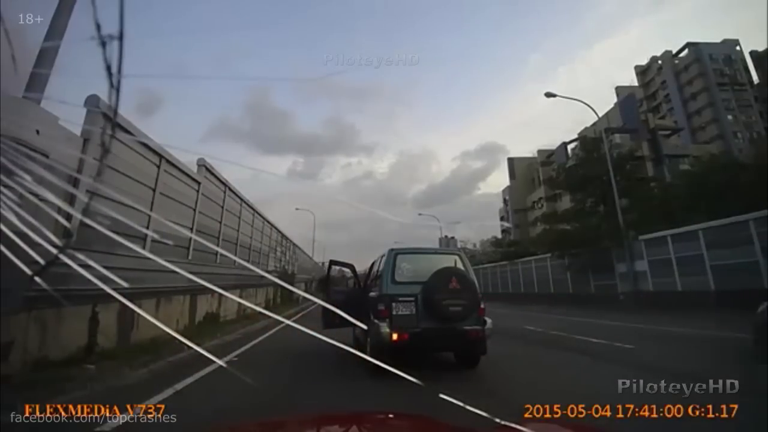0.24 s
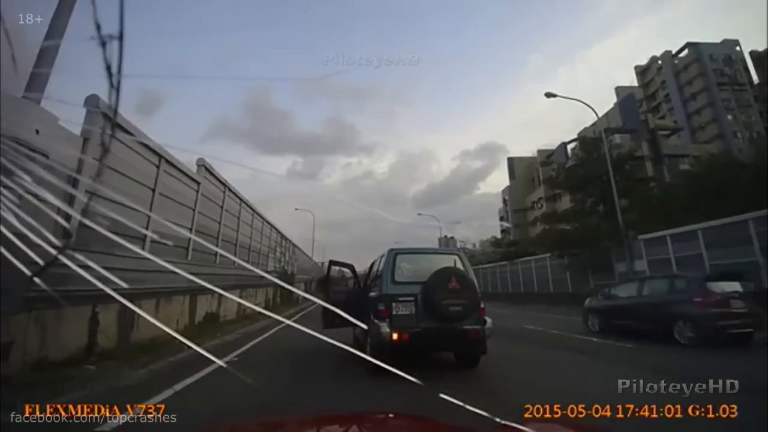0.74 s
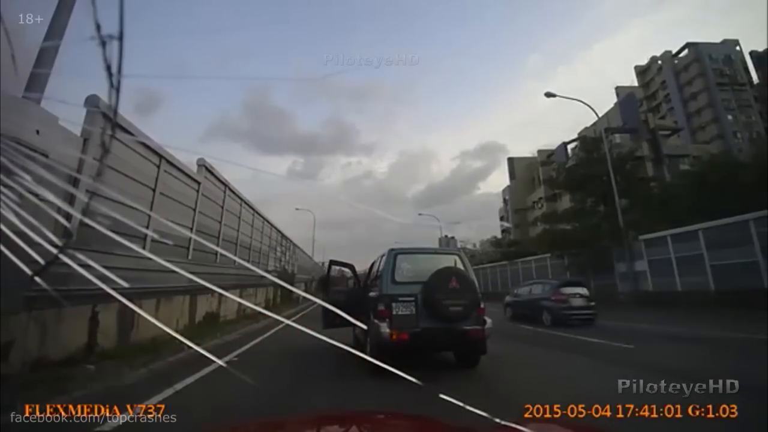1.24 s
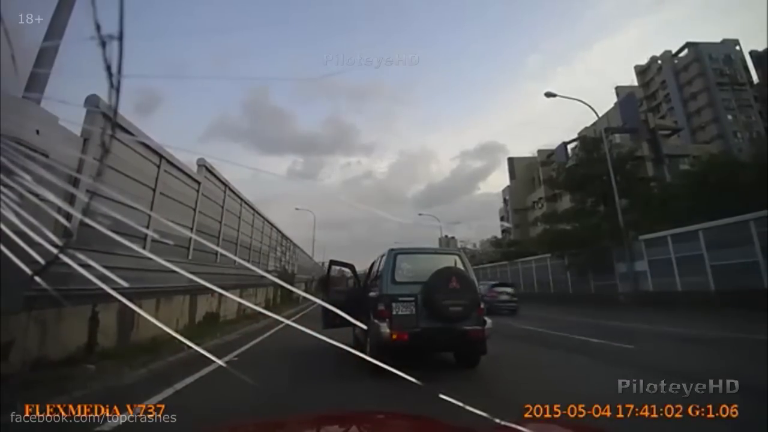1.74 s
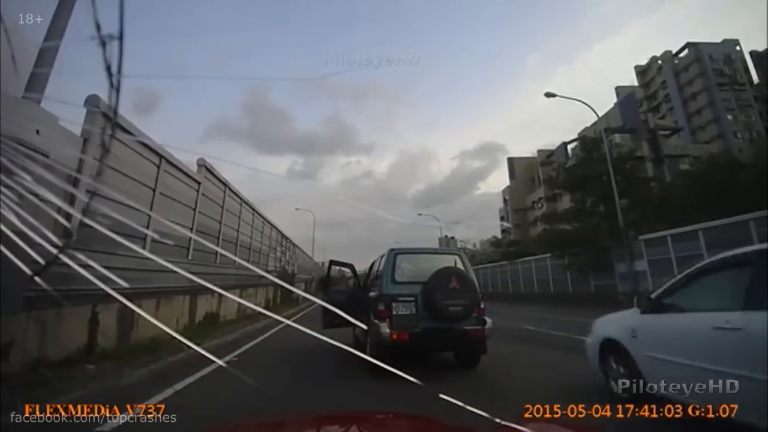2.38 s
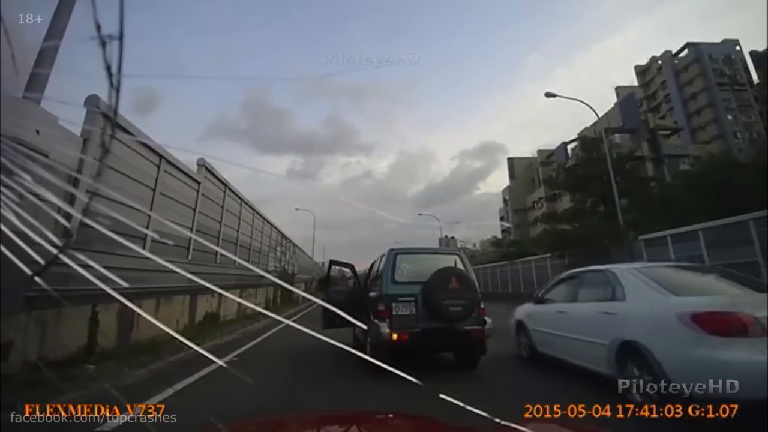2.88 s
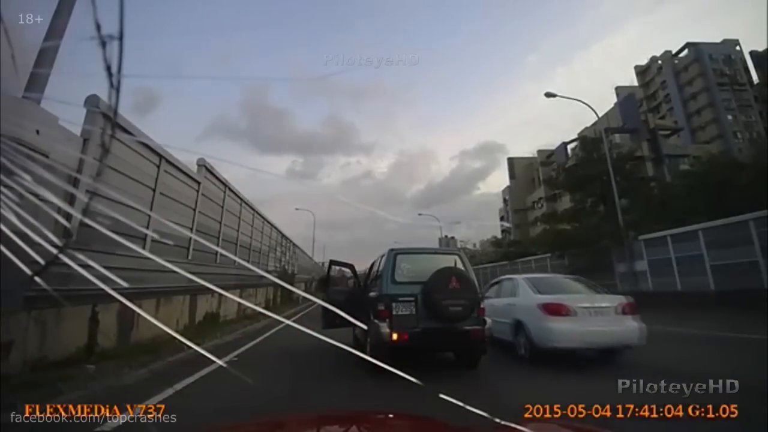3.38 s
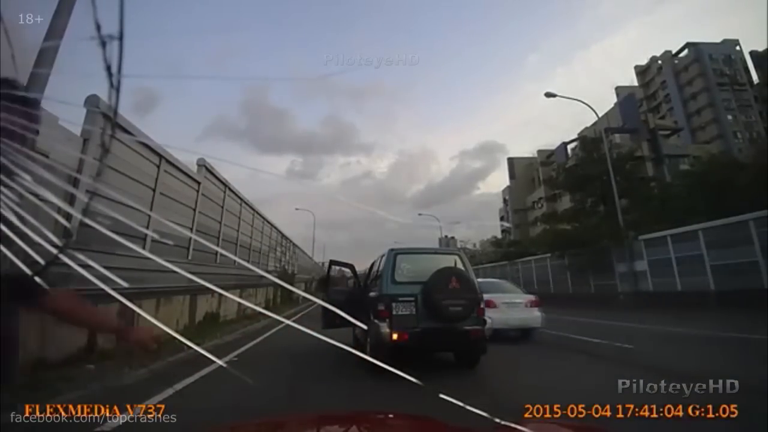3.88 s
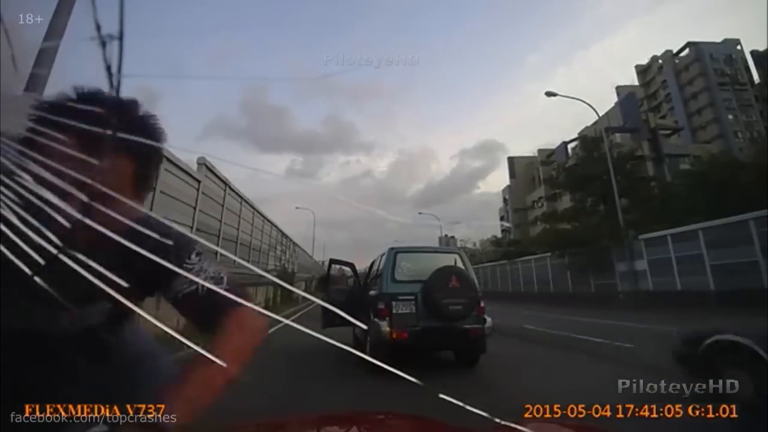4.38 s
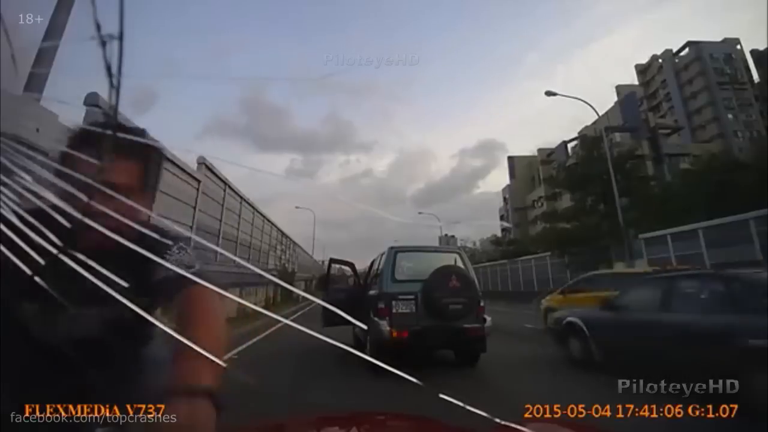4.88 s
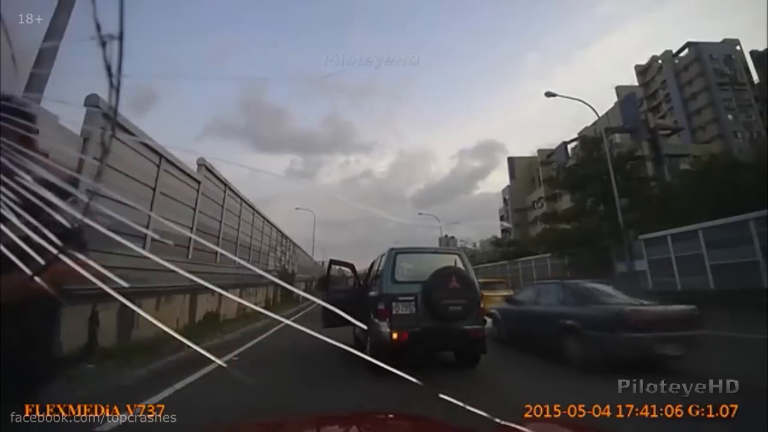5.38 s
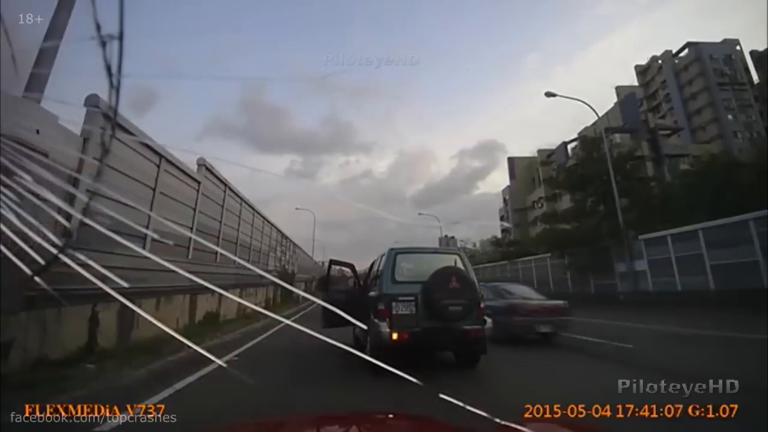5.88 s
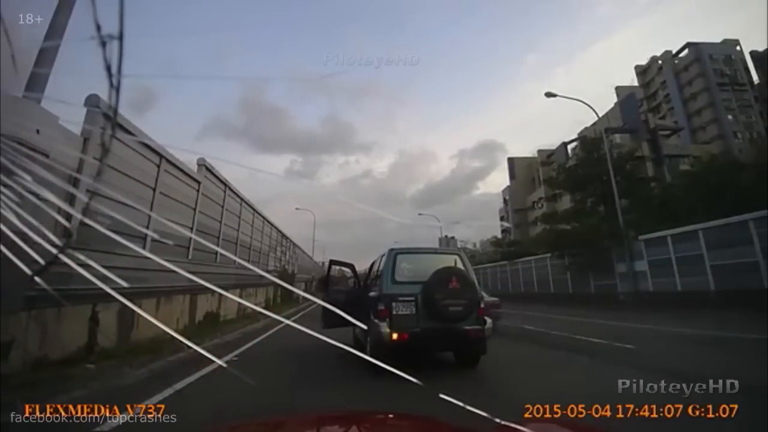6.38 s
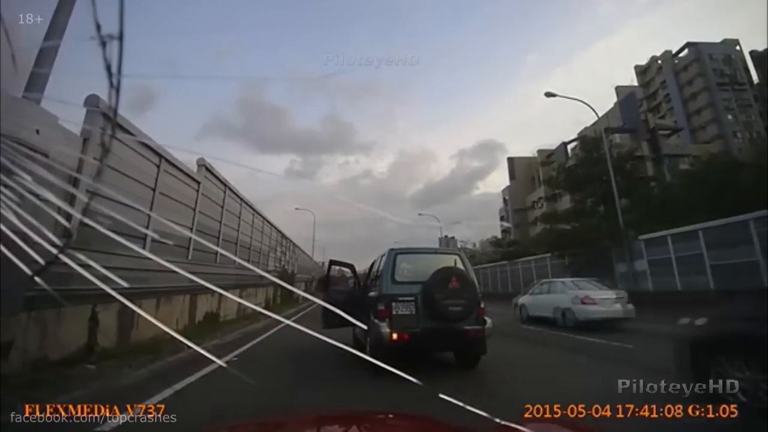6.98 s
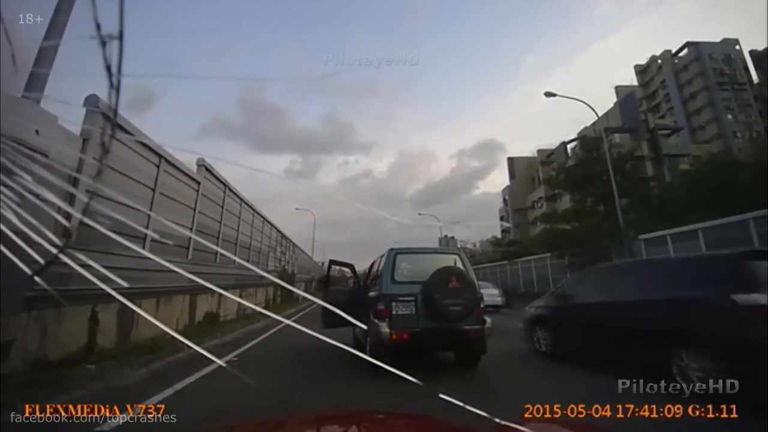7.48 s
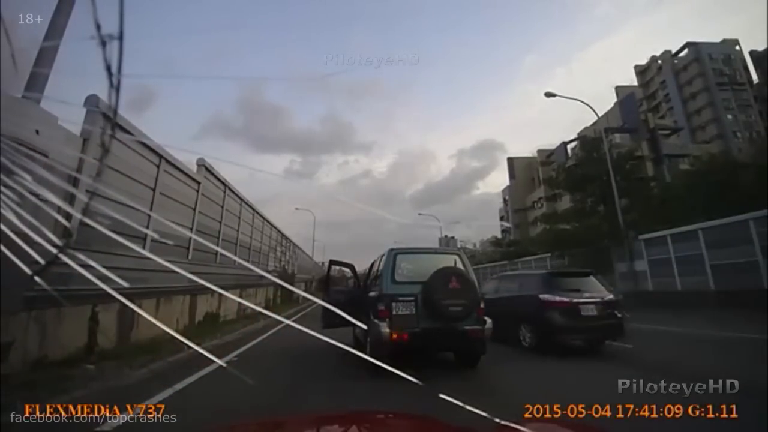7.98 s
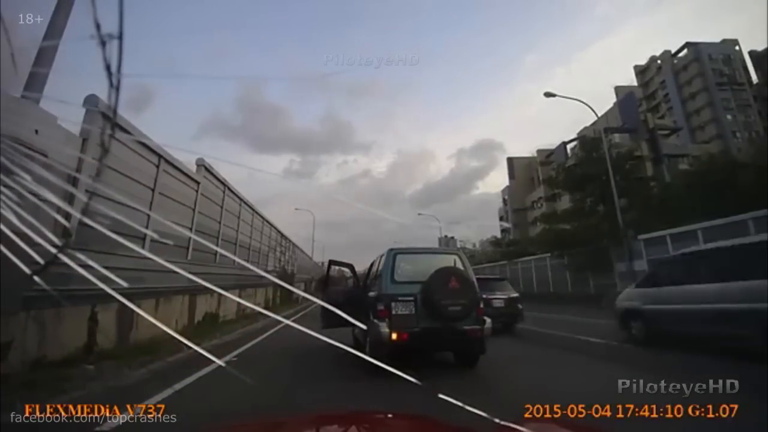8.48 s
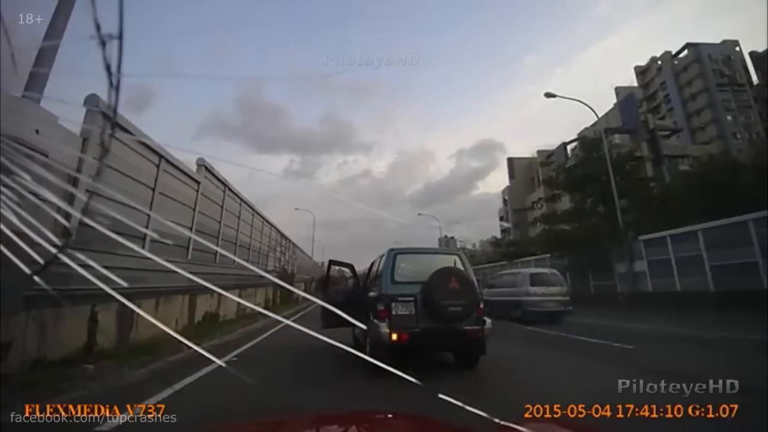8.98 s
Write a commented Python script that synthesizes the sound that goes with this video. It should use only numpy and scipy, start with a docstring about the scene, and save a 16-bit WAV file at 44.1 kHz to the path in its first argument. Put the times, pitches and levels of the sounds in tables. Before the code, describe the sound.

Irregular heavy bangs strike a car body and windscreen, heard from the hushed cabin, with small trim knocks, rubbing and thin plastic ticks between.

```python
"""Muffled road noise, circuit hiss and a faint whine lie low inside a stopped car, heard at its windscreen.
Knocks, rubbing and thin ticks run through the trim, and hard blows crash on the body and glass.
Steady layers are shaped noise and sines. Blows are noisy contact forces: they excite damped modes of body,
panels and trim, with filtered noise for the glass; ticks ring a plastic bracket. The cabin adds a decaying tail."""
import sys
import numpy as np
from scipy import signal
from scipy.fft import rfft, irfft, next_fast_len
from scipy.io import wavfile
from scipy.ndimage import uniform_filter1d

SR = 44100
rng = np.random.default_rng(int(sys.argv[2]) if len(sys.argv) > 2 else 0)


def log_audio(samples):
    """Write samples as a 16-bit WAV file to the path given in sys.argv[1]."""
    # one column per channel
    frames = np.atleast_2d(samples).T
    # limit to full scale, then quantise
    limited = np.clip(frames, -1, 1)
    pcm = np.round(limited * 32767).astype(np.int16)
    wavfile.write(sys.argv[1], SR, pcm)


N = 407484   # samples

# How far from its centre a knock or scuff still stirs the modes.
# Each entry: part, spread in octaves.
KNOCK_SPREAD_OCT = {"body": 0.2, "panel": 0.55, "trim": 1}


def amp(db):
    """Logarithmic level: 20 dB is a tenfold amplitude."""
    return 10 ** (np.asarray(db) / 20)


def rms_one(x):
    """Normalisation of mean power: the result has rms 1."""
    return x / np.sqrt(np.mean(x ** 2) + 1e-20)


def coloured_noise(spectrum):
    """Spectral shaping: white noise weighted in the frequency domain, at rms 1."""
    hz, db = np.transpose(spectrum)
    size = next_fast_len(N)
    log_hz = np.log(np.fft.rfftfreq(size, 1 / SR) + 1)
    gain = amp(np.interp(log_hz, np.log(hz), db, left=-80, right=-80))
    white = rng.standard_normal(size)
    return rms_one(irfft(rfft(white) * gain, size)[:N])


def road():
    """Transmission loss: passing traffic through the glass is noise with its treble removed."""
    # Level of the traffic. Each row: time in seconds, level in dB.
    traffic_level = [(0, -60), (1.5, -60.5), (2.5, -60), (3.9, -60), (4.3, -58), (5.2, -58.5), (5.7, -59.5),
                     (6.1, -59.5), (6.55, -60), (6.75, -56.5), (7.3, -58), (8.2, -58.5), (9.24, -59)]
    # Spectrum behind the glass. Each row: frequency in Hz, relative density in dB per Hz.
    traffic_colour = [(53, -63.5), (90, -23.5), (191, -9.5), (242, -12.5), (278, -8.5), (382, -11.5),
                      (580, -2.5), (631, -4.5), (810, 0.5), (1410, -16.5), (2500, -21.5), (3250, -42.5),
                      (5500, -120)]
    t = np.arange(N) / SR
    level_db = np.interp(t, *np.transpose(traffic_level))
    return amp(level_db) * coloured_noise(traffic_colour)


def rumble():
    """Resonance: white noise through two equal resonators leaves a narrow low band."""
    centre_hz, width_hz, level_db = 46.6, 37, -86.5   # width of each resonator
    b, a = signal.iirpeak(centre_hz, centre_hz / width_hz, fs=SR)
    once = signal.lfilter(b, a, rng.standard_normal(N))
    return amp(level_db) * rms_one(signal.lfilter(b, a, once))


def steady_tone(hz, rms_db, phase_turns=0.0):
    """Pure tone: a sine has a peak of root two times its rms."""
    t = np.arange(N) / SR
    return amp(rms_db) * np.sqrt(2) * np.sin(2 * np.pi * (hz * t + phase_turns))


def hum():
    """Periodic vibration: one low steady sine."""
    return steady_tone(48, -77)


def hiss():
    """Circuit noise: a stationary random signal with a coloured spectrum."""
    # Spectrum of the circuit. Each row: frequency in Hz, relative density in dB per Hz.
    hiss_colour = [(880, -48.5), (1500, -15.5), (2340, -13.5), (3180, -8.5), (3450, -12), (3770, -6),
                   (4870, -6), (5220, -5.5), (6890, -4), (7100, -7), (7920, -1.5), (8570, -5.5),
                   (12200, -11.5), (14300, -22.5), (16000, -39)]
    return amp(-61.5) * coloured_noise(hiss_colour)


def whine():
    """Superposition: thin circuit tones, mostly at multiples of 300 Hz, add with random phases."""
    # Pitches of the tones. Each entry: frequency in Hz.
    tone_hz = [3300, 3900, 4500, 4800, 5100, 5400, 5700, 6000, 6600, 7200, 7681, 7800, 7881, 8000, 8700,
               10200, 11400, 12000]
    # Strengths of the same tones. Each entry: rms level in dB.
    tone_db = [-85, -77.5, -84, -86.5, -72.5, -81.5, -73, -76, -82.5, -69.5, -74.5, -80, -75, -77.5, -84.5,
               -73, -104, -91.5]
    return sum(steady_tone(hz, db, rng.random()) for hz, db in zip(tone_hz, tone_db))


def background():
    """Superposition: the steady sources simply add."""
    return road() + rumble() + hum() + hiss() + whine()


def near(modes, centre_hz, spread_oct):
    """Selective excitation: modes far from the centre of a blow are stirred less, in dB."""
    distance_oct = np.log2(np.array(modes)[:, 0] / centre_hz)
    return -6 * (distance_oct / spread_oct) ** 2


def ring(force, modes, extra_db):
    """Modal synthesis: each force row drives damped resonators in parallel, with its own extra dB per mode."""
    out = 0
    for k, (hz, db, t60) in enumerate(modes):
        r = amp(-60 / (t60 * SR))   # decay per sample
        w = 2 * np.pi * hz / SR
        gain = amp(db + extra_db[:, [k]]) * np.sqrt(1 - r)
        resonance = signal.lfilter([0, np.sin(w)], [1, -2 * r * np.cos(w), r * r], force + 1e-18)
        out = out + gain * resonance
    return out


def radiate(rows, part):
    """Radiation: each part passes only its own frequency range to the air."""
    # Radiating range of each part. Each entry: part, then low and high edges in Hz.
    part_range = {"panel": (45, 404), "body": (451.4, 1660), "trim": (1237, 7200), "glass": (5200, 10300)}
    return signal.sosfilt(signal.butter(2, part_range[part], "band", fs=SR, output="sos"), rows)


def at_level(rows, envelope, db):
    """Energy matching: each row gets the energy of a sine under its envelope with that peak level."""
    wanted = np.sum(envelope ** 2, 1, keepdims=True) / 2
    present = np.sum(rows ** 2, 1, keepdims=True)
    return rows * amp(db) * np.sqrt(wanted / present)


def place(times, rows):
    """Superposition in time: each row is added from its own start in seconds."""
    out = np.zeros(N + rows.shape[1])
    for s, row in zip(times, rows):
        start = round(s * SR)
        out[start:start + len(row)] += row
    return out[:N]


def blows(columns, spread_oct, grain_db, focus_db, size):
    """Impact excitation: a rattle of contacts with one main contact drives body, panels, trim and glass."""
    # Modes of body and camera mount. Each row: frequency in Hz, relative level in dB, t60 in seconds.
    body_modes = [(390, 6.5, .04), (473, -11.5, 0.013), (463, -10.5, 0.013), (607, -0.5, 0.019),
                  (682, 7, 0.042), (772.7, 4.5, 0.04), (834, -4, 0.067), (907.5, 3, 0.028),
                  (976.4, 1, 0.13), (1210, -12, 0.0048), (1414, -16.5, 0.086)]
    # Modes of the large panels. Each row: frequency in Hz, relative level in dB, t60 in seconds.
    panel_modes = [(60, -9, 0.19), (87.7, -7.5, 0.11), (130, -8, 0.59), (151, 0.5, 0.15), (192, 2.5, 0.068),
                   (190, -13.5, 1.3), (224, -1.5, 0.078), (270, -6, 0.051), (327, 2.5, 0.059),
                   (380.6, -6.5, .06)]
    # Modes of the trim. Each row: frequency in Hz, relative level in dB, t60 in seconds.
    trim_modes = [(1380, -3.5, .015), (1406, -5, .012), (1810, -3, 0.014), (2075, 3.5, 0.013),
                  (2300, 1.5, 0.0068), (2720, -0.5, 0.0075), (2992, 1.5, .018), (3330, 3.5, 0.0083),
                  (3756, 6, 0.0063), (4440, 1.5, 0.007), (4660, -2.5, 0.015), (5230, 5.5, 0.005),
                  (5960, 4.5, 0.017), (6960, -12.5, 0.011)]
    # Decay of the treble forces. Each entry: layer, share of the blow's t60 (a ratio).
    treble_share = {"clatter": 0.83, "sizzle": 0.56}
    treble_rise_factor = 2.1   # loose parts start to rattle after the body has moved
    soft_contact_hz, focus_oct = 1225, 0.063
    # every setting becomes a column with one row per blow
    peak_s, body_db, body_hz, thud_db, thud_hz, clatter_db, clatter_hz, sizzle_db, rise, hold, t60, main_db = \
        np.array(np.broadcast_arrays(*columns))[:, :, None]
    t = np.arange(size) / SR

    draws = rng.standard_normal((len(peak_s), 2, size))
    grains = draws[:, 0]
    lumps = uniform_filter1d(draws[:, 1], size=64) * np.sqrt(64)   # contacts bunch over a millisecond or two
    contacts = grains * amp(grain_db * np.clip(lumps, -3, 2))
    rise_end = (rise[:, 0] * SR).astype(int)
    contacts[np.arange(len(peak_s)), rise_end] -= amp(main_db[:, 0])

    after = np.maximum(t - rise - hold, 0) / t60   # decay time in units of t60
    swell = np.sin(np.pi / 2 * np.minimum(t / rise, 1)) ** 2
    loose = np.sin(np.pi / 2 * np.minimum(t / (rise * treble_rise_factor), 1)) ** 2
    shape = swell * amp(-60 * after)
    clatter_shape = loose * amp(-60 * after / treble_share["clatter"])
    sizzle_shape = loose * amp(-60 * after / treble_share["sizzle"])

    # padding and rubber round off the force before it reaches body and panels
    soften = signal.butter(2, soft_contact_hz, fs=SR, output="sos")
    force = signal.sosfilt(soften, contacts * shape)
    body = ring(force, body_modes, near(body_modes, body_hz, spread_oct["body"]))
    panel = ring(force, panel_modes, near(panel_modes, thud_hz, spread_oct["panel"]))
    # trim modes right at the centre of a blow stand out
    focus = focus_db * amp(near(trim_modes, clatter_hz, focus_oct))
    trim_extra_db = near(trim_modes, clatter_hz, spread_oct["trim"]) + focus
    trim = ring(contacts * clatter_shape, trim_modes, trim_extra_db)
    glass = grains * sizzle_shape

    out = at_level(radiate(body, "body"), shape, body_db)
    out += at_level(radiate(panel, "panel"), shape, thud_db)
    out += at_level(radiate(trim, "trim"), clatter_shape, clatter_db)
    out += at_level(radiate(glass, "glass"), sizzle_shape, sizzle_db)
    return place(peak_s[:, 0] - rise[:, 0], out)


def knocks():
    """Short impact: a sharp force on the trim; harder knocks are more of one contact."""
    # Knocks, soft and hard. Each row: end of the rise in seconds, body level in dB, body centre in Hz,
    # thud level in dB, clatter level in dB, clatter centre in Hz, t60 of the force in seconds.
    knock_rows = [(0.185, -45, 516, -49, -55.5, 3480, 0.28), (0.848, -38.5, 940, -49.5, -66, 3500, 0.053),
                  (4.164, -37.5, 830, -47, -60, 2000, 0.046), (4.312, -46.5, 815, -59, -59, 3500, 0.077),
                  (4.424, -38, 725, -49, -60, 3600, 0.24), (4.464, -41.5, 775, -51, -42, 2070, 0.18),
                  (4.489, -47, 816, -64, -46, 3330, 0.11), (4.52, -34, 675, -47.5, -50.5, 2120, 0.17),
                  (4.574, -17.5, 950, -57, -33.5, 1880, 0.073), (4.594, -22, 830, -60, -40.5, 1650, 0.091),
                  (4.619, -27, 696, -57, -47, 1930, 0.14), (4.678, -38, 790, -68, -48, 2220, 0.092),
                  (4.694, -31, 880, -68, -38, 2380, 0.064), (4.804, -43, 580, -63, -55, 3480, 0.17),
                  (4.839, -43, 730, -61, -58, 3820, 0.19), (4.879, -7, 833, -45, -20, 2380, 0.041),
                  (4.899, -30, 895, -39.5, -62, 1520, 0.12), (4.941, -36, 860, -55, -57, 1750, 0.1),
                  (4.985, -33, 830, -50, -56, 1860, 0.071), (5.033, -40.5, 820, -59, -56, 2000, 0.07),
                  (5.113, -50, 850, -71, -73, 3500, 0.063), (5.201, -44, 720, -72, -58, 3500, 0.083),
                  (5.337, -46, 720, -60, -58, 2000, 0.16), (5.402, -45, 783, -70, -63, 3500, 0.07),
                  (5.418, -37.5, 960, -54, -45.5, 1950, 0.06), (5.529, -48.5, 805, -55, -70, 3500, 0.11),
                  (6.131, -24.5, 700, -41.5, -35, 1900, 0.055), (6.16, -14, 900, -42, -27, 1900, 0.095),
                  (6.2, -31, 770, -45, -37.5, 1590, 0.11), (6.261, -6.5, 905, -64, -16.5, 2680, 0.018),
                  (6.298, -38, 820, -67, -33.5, 3800, 0.091), (6.333, -36.5, 905, -70, -38, 1500, 0.065),
                  (6.368, -46, 920, -72, -48, 1490, 0.18), (6.428, -37, 790, -70, -51, 3820, 0.3),
                  (6.455, -42, 635, -77, -46.5, 2060, 0.11), (6.519, -42.5, 563, -63, -67, 3500, 0.039),
                  (6.767, -6.5, 940, -61, -19.5, 2650, 0.073), (6.799, -26.5, 860, -34.5, -31, 3230, 0.087),
                  (6.831, -28, 766, -37, -39, 2900, 0.075), (6.85, -30, 830, -47, -45, 2280, 0.089),
                  (6.889, -51, 921, -64, -49, 3660, 0.1), (6.945, -32.5, 755, -58, -53, 3280, 0.053),
                  (6.981, -29.5, 780, -39, -45, 1830, 0.093), (7.032, -24.5, 554, -60, -40.5, 2000, 0.088),
                  (7.144, -43, 690, -66, -62, 3500, 0.095), (7.177, -48, 748, -69, -65, 3500, 0.055),
                  (7.252, -46, 725, -69, -56, 3500, 0.07), (7.336, -32, 710, -64.5, -57, 2000, 0.082),
                  (7.379, -46, 424, -49.5, -56, 2030, 0.13), (7.547, -32, 840, -64, -43, 3000, 0.022),
                  (7.894, -42, 720, -70, -60, 2000, 0.034), (8.237, -42.5, 870, -71, -63, 3500, 0.097)]
    thud_hz, rise_s, hold_s = 240, 0.003, 0.002
    sizzle_db = -14.5   # relative to the clatter
    main_at_zero_db, main_per_db = 23, 0.4   # main contact for a body level of 0 dB, and its slope
    s, body_db, body_hz, thud_db, clatter_db, clatter_hz, t60 = np.transpose(knock_rows)
    main_db = main_at_zero_db + main_per_db * body_db
    columns = (s, body_db, body_hz, thud_db, thud_hz, clatter_db, clatter_hz, clatter_db + sizzle_db,
               rise_s, hold_s, t60, main_db)
    return blows(columns, KNOCK_SPREAD_OCT, grain_db=0.0, focus_db=10.5, size=SR // 3)


def scuffs():
    """Friction: a hand or sleeve rubbing along the body swells slowly, with no contact that stands out."""
    # Rubs. Each row: end of the rise in seconds, body level in dB, body centre in Hz, clatter level in dB,
    # clatter centre in Hz, hold in seconds, t60 of the force in seconds.
    scuff_rows = [(0.206, -55, 500, -56, 2000, .02, 0.091), (4.469, -47, 710, -50, 3500, 0.03, .05),
                  (4.70, -40, 890, -58, 2100, 0.014, .06), (6.33, -46, 780, -44.5, 3800, 0.012, 0.2),
                  (6.455, -36.5, 650, -57, 2000, 0.021, 0.12), (6.873, -50, 970, -58, 3500, 0.047, 0.18),
                  (7.369, -49, 600, -57.5, 2000, 0.018, 0.14)]
    rise_s, thud_hz = 0.022, 249
    thud_db, sizzle_db = -19.5, -19   # relative to body and to clatter
    s, body_db, body_hz, clatter_db, clatter_hz, hold, t60 = np.transpose(scuff_rows)
    columns = (s, body_db, body_hz, body_db + thud_db, thud_hz, clatter_db, clatter_hz,
               clatter_db + sizzle_db, rise_s, hold, t60, 0)
    return blows(columns, KNOCK_SPREAD_OCT, grain_db=2.5, focus_db=13, size=SR // 3)


def crashes():
    """Hard impact: blows shake panels and glass, and the opening contact is the cleanest."""
    # Landings, often in close pairs before softer rebounds. Each row: end of the rise in seconds,
    # body level in dB, body centre in Hz, thud level in dB, thud centre in Hz, clatter level in dB,
    # clatter centre in Hz, sizzle level in dB, hold in seconds, t60 of the force in seconds.
    crash_rows = [(0.926, -20, 710, -25, 363, -27, 1800, -39.5, 0.018, 0.28),
                  (0.942, -19.5, 660, -58, 315, -25, 3340, -55, 0.018, 0.14),
                  (1.006, -54, 1020, -60, 350, -35, 3480, -45, 0.007, 0.22),
                  (1.070, -31.5, 620, -41, 340, -47, 1940, -56, 0.017, 0.22),
                  (1.099, -38, 750, -60, 336, -48, 1730, -56, 0.019, 0.12),
                  (1.146, -46.5, 604, -56, 285, -50.5, 2080, -57, 0.004, 0.25),
                  (1.934, -20.5, 700, -23.5, 326, -21.5, 2860, -55, 0.013, 0.18),
                  (1.951, -18, 694, -33, 316, -32, 2010, -38, 0.009, 0.16),
                  (2.057, -46, 730, -50.5, 102, -51, 3340, -57, 0.014, 0.12),
                  (2.080, -33.5, 706, -45.5, 338, -49, 1790, -65, 0.027, 0.24),
                  (7.566, -15, 1030, -13.5, 330, -6.5, 3550, -19, 0.004, 0.12),
                  (7.577, -12.5, 678, -26, 350, -17.5, 3150, -21, 0.006, 0.11),
                  (7.622, -37.5, 792, -45.5, 148, -39.5, 1560, -50, 0.034, 0.16),
                  (7.676, -40, 703, -52.5, 127, -52, 1780, -56, 0.0085, 0.215),
                  (8.011, -13.5, 660, -31, 180, -6, 3810, -7.5, 0.007, 0.073),
                  (8.036, -29, 735, -38, 219, -34.5, 3500, -51, 0.007, 0.12),
                  (8.516, -6.5, 1005, -47, 288, -7.5, 4700, -13, 0.004, 0.13),
                  (8.523, -15.5, 794, -21.5, 352, -9, 2950, -11.5, 0.0066, 0.14),
                  (8.573, -27, 661, -31.5, 143, -25, 1610, -61, 0.01, 0.15),
                  (8.641, -42.5, 926, -45, 350, -46, 3840, -49, 0.017, 0.08)]
    # How far from its centre a crash still stirs the modes. Each entry: part, spread in octaves.
    crash_spread = {"body": 0.66, "panel": 0.52, "trim": 1}
    rise_s, blow_gap_s = 0.004, 0.2   # a longer pause opens a new blow
    opening_db, later_db = 18.5, 6   # main contact over the rattle
    *colour, hold, t60 = np.transpose(crash_rows)
    opens = np.diff(colour[0], prepend=0) > blow_gap_s
    main_db = np.where(opens, opening_db, later_db)
    columns = *colour, rise_s, hold, t60, main_db
    return blows(columns, crash_spread, grain_db=2.5, focus_db=6.5, size=SR // 2)


def ticks():
    """Impulse response: one click and a very short burst of contacts ring the plastic camera bracket."""
    # Thin plastic ticks. Each row: start in seconds, level in dB, centre in Hz.
    tick_rows = [(1.1994, -50.5, 3900), (1.7085, -50, 3620), (2.1943, -49.5, 4490), (4.35, -39.5, 3650),
                 (4.4149, -46, 3300), (4.4375, -28, 3580), (4.4554, -34, 3390), (4.4643, -42, 3650),
                 (4.4756, -38.5, 3720), (4.4854, -37, 3670), (4.499, -45, 3640), (4.7945, -47, 3320),
                 (5.219, -43, 2930), (6.2072, -33, 3880), (6.225, -42, 3700), (6.31, -38, 3700),
                 (7.44, -41.5, 3660), (7.4594, -47, 3350), (7.7062, -44, 3680), (7.7478, -45.5, 2930),
                 (7.793, -50, 2900), (7.8364, -42, 3300), (7.937, -50, 3000), (8.3995, -28, 3600),
                 (8.413, -45.5, 3740)]
    # Modes of the bracket. Each row: frequency in Hz, relative level in dB, t60 in seconds.
    bracket_modes = [(2120, 4, 0.011), (3000, -4.5, 0.019), (3660, 3.5, .012), (3960, -2.5, 0.01),
                     (4740, -4, .008), (5840, -10, .006)]
    t60_s, click_db = 0.021, 11.5   # click over the contacts
    s, db, centre_hz = np.transpose(tick_rows)[:, :, None]
    t = np.arange(SR // 20) / SR
    shape = amp(-60 * t / t60_s) * np.ones_like(s)
    contacts = rng.standard_normal(shape.shape) * shape
    contacts[:, 0] += amp(click_db)
    rows = ring(contacts, bracket_modes, near(bracket_modes, centre_hz, spread_oct=0.8))
    return place(s[:, 0], at_level(radiate(rows, "trim"), shape, db))


def cabin(x):
    """Reverberation: the cabin's response is noise that dies away exponentially, band by band."""
    # Bands of the cabin. Each row: centre in Hz, gain in dB, t60 in seconds.
    cabin_bands = [(150, -8, 0.26), (340, -15, 0.17), (860, -27.5, 0.72), (2030, -11, 0.099),
                   (4670, -18.5, 0.13), (10000, -36, .12)]
    t = np.arange(SR // 2) / SR
    answer = 0
    for hz, db, t60 in cabin_bands:
        band = signal.butter(2, [hz / 1.5, hz * 1.5], "band", fs=SR, output="sos")
        tail = signal.sosfilt(band, rng.standard_normal(len(t))) * amp(-60 * t / t60)
        tail = tail * (t > 0.004)   # a gap ahead of the tail, in seconds
        answer = answer + amp(db) * tail * np.sqrt(hz / SR / np.sum(tail ** 2))   # energy follows bandwidth
    return signal.fftconvolve(x, answer)[:N]


def scene():
    """High-pass response: the small microphone capsule drops the deepest part of the blows."""
    hits = knocks() + scuffs() + crashes() + ticks()
    capsule = signal.butter(2, 73.5, "high", fs=SR, output="sos")   # corner in Hz
    heard = signal.sosfilt(capsule, hits + cabin(hits))
    return (heard + background())[None]


def record(dry):
    """Saturation and band limiting: peaks are rounded, then the top is cut; all levels above precede this."""
    rounded = 0.86 * np.tanh(dry / 1.101)
    low_pass = signal.cheby2(12, 70, 16300, fs=SR, output="sos")   # order, stopband dB, stopband edge Hz
    return signal.sosfilt(low_pass, rounded)


dry = scene()
out = record(dry)
log_audio(out)
```